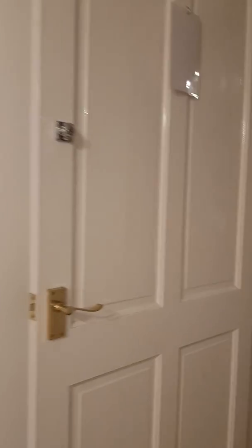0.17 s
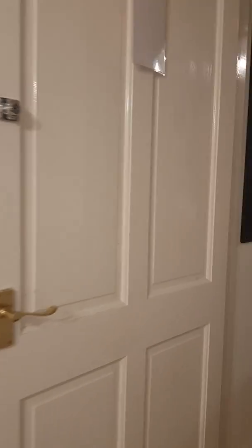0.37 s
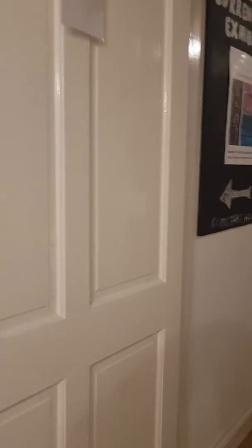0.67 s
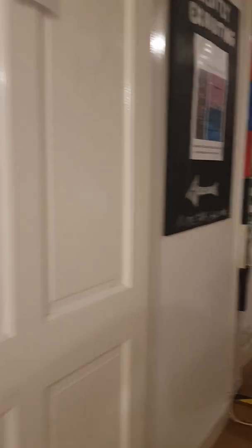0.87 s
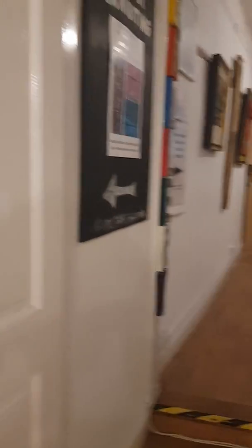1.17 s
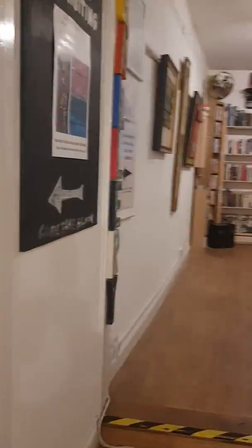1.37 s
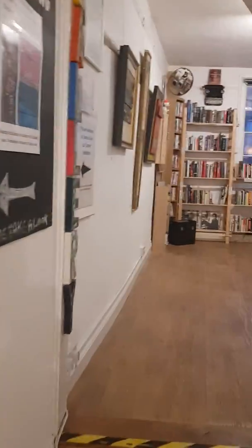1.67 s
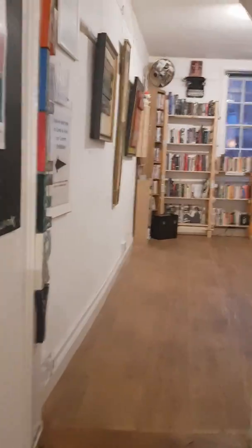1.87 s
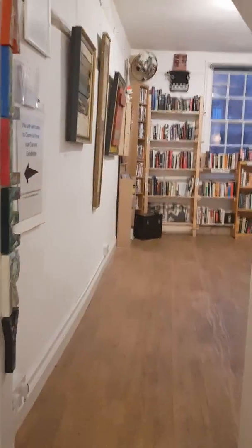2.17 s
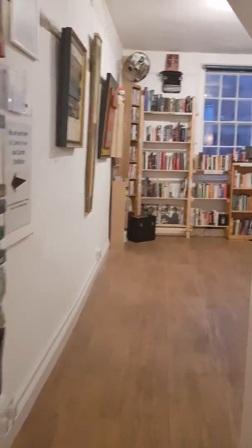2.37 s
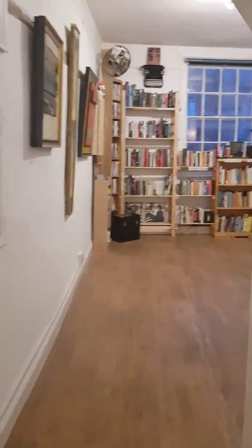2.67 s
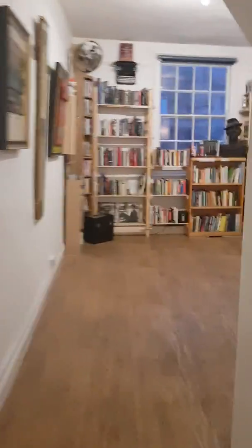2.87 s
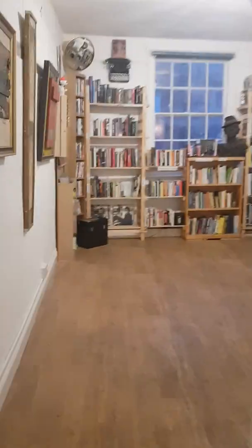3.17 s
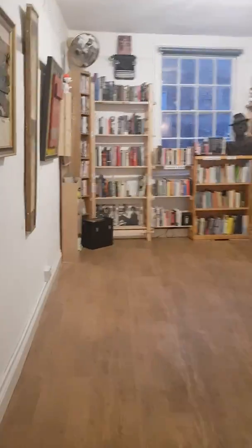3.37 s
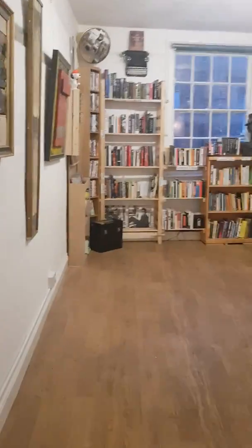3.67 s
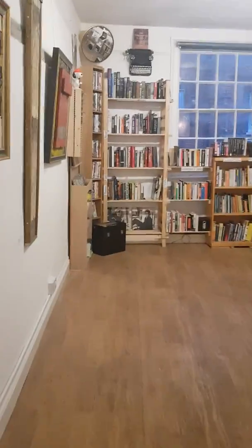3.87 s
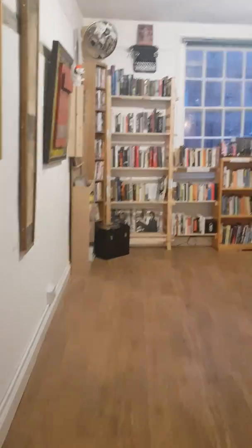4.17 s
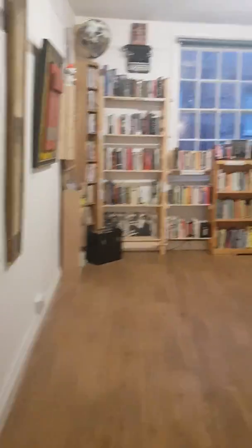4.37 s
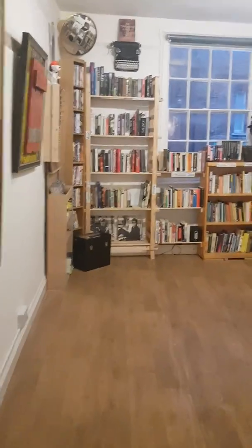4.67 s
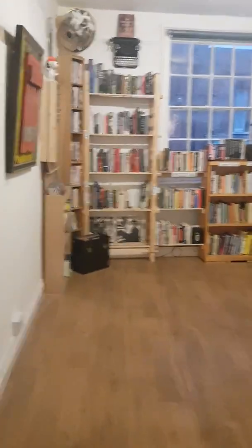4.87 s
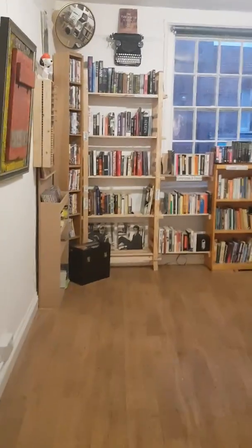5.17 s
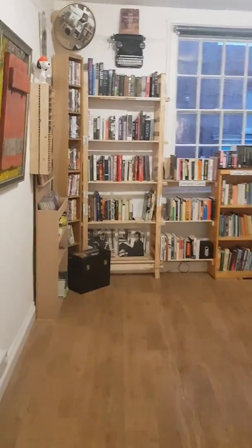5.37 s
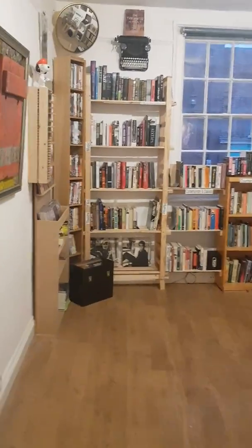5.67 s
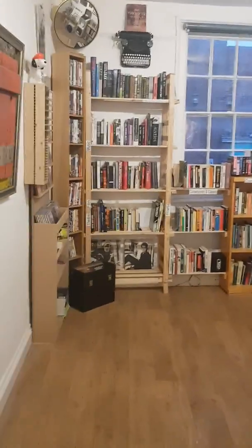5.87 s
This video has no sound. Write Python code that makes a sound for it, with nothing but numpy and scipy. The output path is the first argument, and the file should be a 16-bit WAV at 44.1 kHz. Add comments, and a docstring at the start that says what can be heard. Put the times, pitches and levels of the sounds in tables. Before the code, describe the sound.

Inside a quiet house, a person carrying a phone walks over a suspended wooden floor. Light scuffs and soft steps come first, then heavier thuds with hollow knocks and cracking boards, densest just before three seconds. Clothing ticks and a sleeve swishes close by, a finger taps the case, then softer, spaced steps follow. Faint rumble and hiss remain underneath, in stereo with short room reverberation.

```python
"""Soles scuff and step on a suspended wooden floor from the start, over steady house rumble and hiss.
Heel and sole blows set off noise clusters for joists, boards, knock and joint cracks, plus decaying floor modes.
Hollow knocks and low thumps are struck noise with one resonance; cloth and soles rub as tiny slips over a wash.
Close to the phone, clothing ticks as bright bursts, a finger taps the case in two damped sine pips,
and a sleeve swishes past; a faint whine of two wandering tones comes and goes behind it all."""
import sys
import numpy as np
from scipy import signal
from scipy.fft import rfft, irfft, next_fast_len
from scipy.io import wavfile
from scipy.ndimage import uniform_filter1d

SR = 44100
rng = np.random.default_rng(int(sys.argv[2]) if len(sys.argv) > 2 else 0)


def unload_wav(signal):
    """Save mono or channel-first audio to the path in sys.argv[1] as 16-bit WAV at rate SR, clipped to [-1, 1]."""
    wavfile.write(
        sys.argv[1],
        SR,
        np.round(np.clip(np.atleast_2d(signal).T, -1, 1) * 32767).astype(np.int16),
    )


N = 265923
TIME = np.arange(N) / SR  # scene clock, s
AGE = np.arange(32768) / SR  # time since a blow, s


def undb(db):
    """Decibels to amplitude gain."""
    return 10 ** (np.asarray(db) / 20)


def unit(x):
    """Scale to rms 1."""
    return x / np.sqrt(np.mean(x ** 2))


def along_hz(points, size):
    """Read (f/Hz, value) points at the bins of a transform, along log frequency."""
    hz, value = np.transpose(points)
    bins_hz = np.fft.rfftfreq(size, 1 / SR)
    return np.interp(np.log(bins_hz + 1), np.log(hz), value)


def response(colour, size=2048):
    """Minimum-phase impulse response of unit energy with this colour, by folding the cepstrum."""
    cepstrum = irfft(np.log(undb(along_hz(colour, size))))
    cepstrum[1:size // 2] *= 2
    cepstrum[size // 2 + 1:] = 0
    h = irfft(np.exp(rfft(cepstrum)))
    return h / np.linalg.norm(h)


# likeness of the two mic ports in a diffuse field: (f/Hz, correlation from -1 to 1)
PORT_LIKENESS = [(60, 1), (130, 0.82), (290, 0.87), (640, 0.23), (1400, -0.22), (3100, 0.024),
                 (15000, -0.26)]


def diffuse(colour, size):
    """Coloured noise from all sides: mid and side weights set how alike the two ports are at each pitch."""
    n = next_fast_len(size, True)
    alike = np.clip(along_hz(PORT_LIKENESS, n), -1, 1)
    noise = rfft(rng.standard_normal((2, n)))
    mid, side = noise * np.sqrt([1 + alike, 1 - alike]) * undb(along_hz(colour, n))
    return unit(irfft([mid + side, mid - side], n)[:, :size])


def fade(t60):
    """Exponential decay, 60 dB down after t60 seconds."""
    return np.exp(-np.log(1000) * AGE / t60)


def from_below(x, left_db):
    """Sound from the walker's side reaches the right port first; the left has its own level."""
    lag = 20  # samples
    late = np.pad(x, (lag, 0))[:len(x)]
    return np.array([undb(left_db) * late, x])


def add(out, s, x):
    """Mix x into out at time s in seconds."""
    i = int(np.clip(s * SR, 0, N - 1))
    out[:, i:i + x.shape[1]] += x[:, :N - i]


def ring(colour, t60, rise_s, room_db, room_t60, smooth):
    """A dense cluster of modes, struck: noise with its own decay and a room decay beside it."""
    x = diffuse(colour, len(AGE))
    power = uniform_filter1d(np.mean(x ** 2, axis=0), smooth)  # window in samples
    steady = x / np.sqrt(power + 1e-9)
    rise = 1 - np.exp(-AGE / rise_s)
    decay = np.hypot(fade(t60), undb(room_db) * fade(room_t60))
    return steady * rise * decay


def snap(colour, t60, left_db):
    """Direct sound of a tiny slip: a short coloured noise burst, unit energy before the ports."""
    size = 2048
    noise = (fade(t60) * rng.standard_normal(len(AGE)))[:size]
    burst = signal.fftconvolve(noise, response(colour))[:size]
    return from_below(burst / np.linalg.norm(burst), left_db)


def strokes(table, attack_share, release_s):
    """Gain of timed spells: each swells over a share of its length, holds, then dies 60 dB in release_s."""
    power = np.zeros(N)
    for s, length, db in table:
        swell = np.clip((TIME - s) / (attack_share * length), 0, 1)
        release = np.exp(-np.log(1000) * np.maximum(TIME - s - length, 0) / release_s)
        power += (undb(db) * swell * release) ** 2
    return np.sqrt(power)


def friction(gain, colour, grain_db, per_s, spread_db, uneven_db):
    """Rubbing: tiny slips of uneven size heard directly, over their wash in the room; the pressure wavers."""
    sign = rng.choice([-1, 1], N)
    size_db = spread_db * np.minimum(rng.exponential(size=N), 4)
    slips = (rng.random(N) < per_s / SR) * sign * undb(size_db)
    grains = unit(signal.fftconvolve(slips, response(colour))[:N])
    pressure = np.interp(TIME, np.linspace(0, TIME[-1], num=400), rng.standard_normal(400))
    direct = undb(grain_db) * from_below(grains, left_db=-3.5)
    return gain * undb(uneven_db * pressure) * (diffuse(colour, N) + direct)


# tone of the house's rumble and hiss: (f/Hz, relative level/dB)
HOUSE_COLOUR = [(15, -12), (25, 6), (72, 0), (105, -0.5), (223, -14), (439, -21), (1020, -18.5),
                (1700, -19), (2600, -27), (4500, -17.5), (8000, -20), (12500, -28.5), (16000, -62)]


def house_background():
    """Low rumble and soft hiss of the house: steady diffuse noise."""
    return undb(-60) * diffuse(HOUSE_COLOUR, N)


# sliding soles: (start t/s, length/s, level/dB)
SCUFFS = [(.01, 0.032, -52), (.09, 0.2, -61), (.46, 0.049, -50.5), (.885, 0.089, -45), (1.02, 0.18, -48.5),
          (1.28, .19, -54.5), (1.84, .23, -46), (2.42, 0.39, -51.5), (2.75, 0.12, -44), (3.08, 0.31, -61),
          (3.52, 0.11, -51), (3.83, 0.22, -66.5), (4.17, 0.13, -60), (4.372, 0.017, -52.5),
          (4.47, .21, -52.5), (4.82, 0.31, -56), (5.2, 0.17, -60.5), (5.85, 0.33, -57)]
# tone of the sliding soles: (f/Hz, relative level/dB)
SOLE_COLOUR = [(120, -15), (350, 3.5), (800, 5.5), (1500, 8), (2500, -2), (4500, -5.5), (7000, -12.5),
               (16000, -12.5)]


def sole_scuffs():
    """Soles drag over the boards: coarse slips of widely spread size, slow to die away."""
    gain = strokes(SCUFFS, attack_share=0.34, release_s=0.49)
    return friction(gain, SOLE_COLOUR, grain_db=-7.5, per_s=760, spread_db=12.5, uneven_db=2.5)


# what the floor rings with: (centre f/Hz, centre level/dB, t60/s)
FLOOR_RESONANCES = [(58.4, -47, .5), (84, -13.5, 0.21), (105.2, -26.5, 0.63), (183.3, -8, 0.75),
                    (259, -2.5, 0.59), (337, -15.5, 0.97), (603, -7.5, 0.53), (760, -28, .2)]


def floor_modes():
    """The floor's low modes as decaying sines; each blow shifts and weights them a little differently."""
    out = np.zeros(len(AGE))
    for hz, db, t60 in FLOOR_RESONANCES:
        level_chance, pitch_chance = rng.standard_normal(2)
        tone = np.sin(2 * np.pi * hz * (1 + 0.0063 * pitch_chance) * AGE)
        out += undb(db + 0.5 * level_chance) * tone * fade(t60)
    return out


# blows of heel, sole and loose boards: (t/s, force level/dB,
# softness from 0 = hard heel edge to 1 = flat sole under full weight, joint crack level/dB)
BLOWS = [(.018, -48, 0.045, -49), (.044, -47, 0.056, -52), (0.277, -46, 0.57, -75),
         (.448, -46.5, 0.48, -55), (0.551, -54, 0.94, -70), (.888, -49, 0.51, -42.5),
         (.985, -42, 0.63, -65), (1.041, -53, 1, -65), (1.093, -47.5, .4, -43.5),
         (1.148, -41.5, 0.42, -48.5), (1.213, -33.5, 0.24, -32.5), (1.22, -45, .35, -38.5),
         (1.687, -30.5, 0.5, -41.5), (1.767, -35.5, 0.093, -39.5), (1.854, -40, 0.072, -40.5),
         (1.966, -32.5, .4, -37.5), (2.018, -34, 0.21, -36.5), (2.047, -38, 0.48, -49),
         (2.321, -42.5, 0.34, -45), (2.353, -37.5, 0.29, -32.5), (2.421, -36.5, 0.02, -31.5),
         (2.537, -32, 0.23, -43.5), (2.567, -42.5, 0.8, -45), (2.677, -32.5, 0.95, -43),
         (2.688, -27.5, 0.71, -42), (2.772, -26, 0.64, -41.5), (2.807, -29.5, 0.48, -37.5),
         (2.85, -28, 0.61, -32), (2.887, -33, 0.25, -34.5), (2.924, -39.5, 0.99, -41.5),
         (3.416, -54, .2, -52.5), (3.46, -45.5, 0.94, -57), (3.561, -38, 0.66, -49.5),
         (3.622, -45, .9, -53.5), (4.127, -43.5, 0.75, -58.5), (4.168, -44.5, 0.75, -59),
         (4.243, -39.5, 0.73, -58), (4.336, -49.5, 0.9, -57.5), (4.76, -46.5, .7, -51.5),
         (4.807, -40, 0.41, -38), (4.973, -34.5, 0.63, -44.5), (5.014, -40.5, 0.8, -55),
         (5.076, -43, 0.56, -49), (5.206, -51, 0.5, -50.5)]
# tone of the boom in the joists: (f/Hz, relative level/dB)
JOIST_COLOUR = [(20, -9), (40, -41), (60, -9.5), (110, -2.5), (150, -17), (260, -44)]
# tone of the thud in the boards: (f/Hz, relative level/dB)
BOARD_COLOUR = [(70, -13), (140, -3), (200, 1), (260, 3), (350, -5.5), (440, -2), (750, -52)]
# tone of the heel's knock: (f/Hz, relative level/dB)
KNOCK_COLOUR = [(220, -45), (420, 1.5), (600, 1), (830, 2.5), (1100, -7), (1500, -8.5), (3000, -81)]
# tone of the cracking joints: (f/Hz, relative level/dB)
CRACK_COLOUR = [(550, -79), (1150, 4.5), (1700, -0.5), (2600, -1), (4200, -4.5), (6000, -9.5),
                (8000, -16.5), (16000, -39)]


def footsteps():
    """Blows boom in joists, thud in boards, knock and crack; softer ones boom more, knock less, ring longer."""
    out = np.zeros((2, N))
    for s, force_db, softness, crack_db in BLOWS:
        # each pair runs from hardest to softest
        boom_db = np.interp(softness, [0, 1], (-23, 8))
        knock_db = np.interp(softness, [0, 1], (3.5, -9.5))
        length = np.interp(softness, [0, 1], (0.53, 0.85))  # factor on the decay
        boom = ring(JOIST_COLOUR, 0.27 * length, rise_s=0.01, room_db=-4, room_t60=0.37, smooth=1400)
        thud = ring(BOARD_COLOUR, 0.12 * length, rise_s=0.0045, room_db=-6.5, room_t60=0.41, smooth=600)
        knock = ring(KNOCK_COLOUR, 0.13 * length, rise_s=0.0024, room_db=-4, room_t60=0.49, smooth=400)
        crack = ring(CRACK_COLOUR, 0.16 * length, rise_s=0.0041, room_db=-3.5, room_t60=0.47, smooth=200)
        add(out, s, undb(force_db + boom_db) * boom)
        add(out, s, undb(force_db) * thud)
        add(out, s, undb(force_db - 9.5) * floor_modes()[None])
        add(out, s, undb(force_db + knock_db) * knock)
        add(out, s, undb(crack_db) * crack)
        add(out, s, undb(crack_db + 23) * snap(CRACK_COLOUR, t60=0.017, left_db=0.5))
    return out


# hollow knocks and low thumps of the floor, one resonance each:
# (t/s, level/dB, pitch f/Hz, half-width at -6 dB/Hz, t60/s)
HOLLOW_KNOCKS = [(.138, -45, 700, 130, 0.14), (0.186, -47.5, 690, 360, 0.34), (0.888, -42, 1230, 120, 0.41),
                 (1.687, -26.5, 162, 78, 0.15), (1.689, -29, 358, 120, 0.29),
                 (1.689, -29.5, 705, 140, 0.31), (2.54, -28.5, 720, 170, 0.11), (2.548, -38, 411, 16, 0.65),
                 (2.572, -32.5, 845, 40, .12), (2.851, -23.5, 262, 10.5, 0.4),
                 (2.925, -39.5, 255.4, 9.5, 0.48), (3.278, -53, 796, 200, .3), (3.416, -47, 1450, 510, 0.5),
                 (3.625, -40, 64, 23, 0.41), (4.128, -35, 444, 20, 0.096), (4.244, -29, 210, 60, 0.073),
                 (4.482, -37, 1110, 360, 0.061), (4.53, -41, 1900, 600, 0.042),
                 (4.758, -36.5, 990, 150, 0.025), (4.975, -38.5, 48, 26, 0.46),
                 (4.977, -31.5, 149, 46, 0.24), (5.951, -42, 1550, 180, 0.054)]


def hollow_knocks():
    """Hollow knocks and low thumps of the floor, each a struck noise burst with one resonance."""
    out = np.zeros((2, N))
    grid = np.geomspace(20, 20000, num=2000)  # Hz
    for s, db, hz, width, t60 in HOLLOW_KNOCKS:
        detune = (grid / hz - hz / grid) * hz / width / 2
        colour = np.c_[grid, -20 * np.log10(1 + detune ** 2)]
        add(out, s, undb(db) * ring(colour, t60, rise_s=0.0014, room_db=-14.5, room_t60=0.41, smooth=500))
    return out


# rubbing cloth: (start t/s, length/s, level/dB)
RUSTLES = [(.47, 0.22, -61), (.887, 0.026, -44.5), (1.31, 0.18, -50), (1.6, 0.68, -59), (1.98, 0.23, -54),
           (2.15, 0.24, -46), (2.45, 0.2, -55), (3, 0.27, -60.5), (3.4, 0.12, -58.5), (3.7, 0.33, -64),
           (4.4, 0.25, -50), (4.85, 0.37, -64), (5.2, 0.094, -56), (5.34, 0.33, -61.5), (5.55, 0.56, -66)]
# tone of the cloth: (f/Hz, relative level/dB)
CLOTH_COLOUR = [(800, -26), (2500, 4.5), (4500, 6), (7500, 7), (10000, 3.5), (12000, 7.5), (13500, 2.5),
                (15200, 2), (16500, -30)]


def cloth_rustle():
    """Clothes rub: dense, fairly even slips with a bright tone."""
    gain = strokes(RUSTLES, attack_share=0.41, release_s=0.62)
    return friction(gain, CLOTH_COLOUR, grain_db=-8, per_s=950, spread_db=4.5, uneven_db=2)


# small clicks of clothing near the phone: (t/s, level/dB)
CLOTH_TICKS = [(0.68, -49.5), (1.041, -42.5), (1.212, -39), (1.353, -40.5), (1.464, -41), (1.678, -46.5),
               (1.964, -44), (2.018, -39.5), (2.081, -43.5), (2.188, -36.5), (2.22, -36.5), (2.352, -38),
               (2.421, -32.5), (2.728, -28.5), (2.811, -35.5), (2.841, -32.5), (2.892, -35.5), (3.116, -49),
               (3.717, -49.5), (3.862, -44), (4.375, -40), (4.599, -40.5), (4.636, -44), (4.662, -40),
               (4.713, -41.5), (4.807, -46), (4.854, -45), (4.973, -42), (5.216, -45), (5.356, -51),
               (5.418, -42.5), (5.508, -42), (5.664, -51), (5.904, -51)]
# tone of the clicks: (f/Hz, relative level/dB)
TICK_COLOUR = [(1200, -9), (3500, -9.5), (7000, -3), (9500, -6), (12000, -2), (13500, -9), (15000, -4),
               (16500, -48)]


def ticks():
    """Close clicks: a direct snap of noise and a short bright wash."""
    out = np.zeros((2, N))
    for s, db in CLOTH_TICKS:
        wash = ring(TICK_COLOUR, t60=0.09, rise_s=0.00091, room_db=-7.5, room_t60=0.54, smooth=200)
        add(out, s, undb(db - 4.5) * wash)
        add(out, s, undb(db + 23.5) * snap(TICK_COLOUR, t60=0.008, left_db=-13))
    return out


# finger taps on the case: (t/s, level/dB)
CASE_TAPS = [(0.8562, -24.5), (3.1592, -14.5)]


def taps(hz=1400, width_hz=1300, case_hz=680, case_t60=0.013, case_db=-14):
    """A fingertip meets the case beside the right port: a round, dry pip of two damped sines, no room."""
    pip = np.exp(-np.pi * width_hz * AGE) * np.sin(2 * np.pi * hz * AGE)
    case = undb(case_db) * fade(case_t60) * np.sin(2 * np.pi * case_hz * AGE)
    pip = pip / pip.max() + case
    band = signal.butter(4, [450, 2700], "band", fs=SR, output="sos")
    pip = signal.sosfilt(band, pip) + undb(-15) * pip  # a little unfiltered edge
    out = np.zeros((2, N))
    for s, db in CASE_TAPS:
        add(out, s, undb(db) * from_below(pip, left_db=-18))
    return out


def wavering_tone(hz, width_hz, wander_hz):
    """A narrow line whose strength and pitch wander: slow noise on two quadrature carriers, mid and side."""
    wander = np.interp(TIME, np.linspace(0, TIME[-1], num=30), rng.standard_normal(30))
    phase = 2 * np.pi * np.cumsum(hz + wander_hz * wander) / SR
    slow = signal.butter(2, width_hz / 2, fs=SR, output="sos")
    drift = signal.sosfilt(slow, rng.standard_normal((2, 2, N)))
    mid, side = drift[0] * np.cos(phase) + drift[1] * np.sin(phase)
    return unit(np.array([mid + side / 2, mid - side / 2]))


# spells of the whine on its low note: (start t/s, length/s, level/dB)
LOW_NOTE = [(2.18, 0.033, -53), (3.13, 0.15, -59.5), (3.45, .8, -63), (5.93, 0.094, -63.5)]
# spells of the whine on its high note: (start t/s, length/s, level/dB)
HIGH_NOTE = [(2.99, 0.19, -60.5), (3.88, 0.23, -74), (5.92, .1, -71)]


def whine():
    """A faint whine on two notes, each a wavering tone that swells and dies in spells."""
    low = wavering_tone(hz=429, width_hz=61, wander_hz=14)
    high = wavering_tone(hz=1790, width_hz=120, wander_hz=30.44)
    low_gain = strokes(LOW_NOTE, attack_share=0.21, release_s=0.7)
    high_gain = strokes(HIGH_NOTE, attack_share=0.19, release_s=1.0)
    return low_gain * low + high_gain * high


# a sleeve passing the phone: (start t/s, length/s, level/dB)
SLEEVE_SWISHES = [(2.725, 0.044, -40), (2.79, .04, -45), (2.832, .018, -33.5), (2.89, 0.045, -48)]
# tone of the sleeve: (f/Hz, relative level/dB)
SLEEVE_COLOUR = [(3000, -32), (6000, -12), (9500, -9), (12000, -8), (13500, -6), (14700, 3), (15500, -1),
                 (16500, -27)]


def sleeve_swish():
    """A sleeve swishes past the phone: very bright, quick to stop, under strongly uneven pressure."""
    gain = strokes(SLEEVE_SWISHES, attack_share=0.45, release_s=0.063)
    return friction(gain, SLEEVE_COLOUR, grain_db=-9, per_s=1200, spread_db=4.5, uneven_db=8.0)


def scene():
    """Steps, scuffs, hollow knocks, clothing and taps in the quiet room."""
    floor = sole_scuffs() + footsteps() + hollow_knocks()
    close = cloth_rustle() + ticks() + taps() + sleeve_swish()
    return house_background() + floor + close + whine()


# tone of the left port, with a deep notch in the treble: (f/Hz, gain/dB)
LEFT_PORT_COLOUR = [(30, -7.5), (70, 4), (130, 0), (1000, -0.5), (2200, 1), (6600, 1.5), (7400, -34),
                    (9500, -4), (12000, -6.5), (16000, -4.5)]


def record(dry):
    """The left port colours its side; the microphones add a faint hiss; the phone cuts the top."""
    n = next_fast_len(N, True)
    left = irfft(rfft(dry[0], n) * undb(along_hz(LEFT_PORT_COLOUR, n)), n)[:N]
    hiss = undb(-72) * rng.standard_normal((2, N))  # before the top cut
    top_cut = signal.ellip(10, .2, 80, 16400, fs=SR, output="sos")  # steep low-pass, edge in Hz
    return signal.sosfilt(top_cut, np.array([left, dry[1]]) + hiss)


dry = scene()
out = record(dry)
unload_wav(out)
```